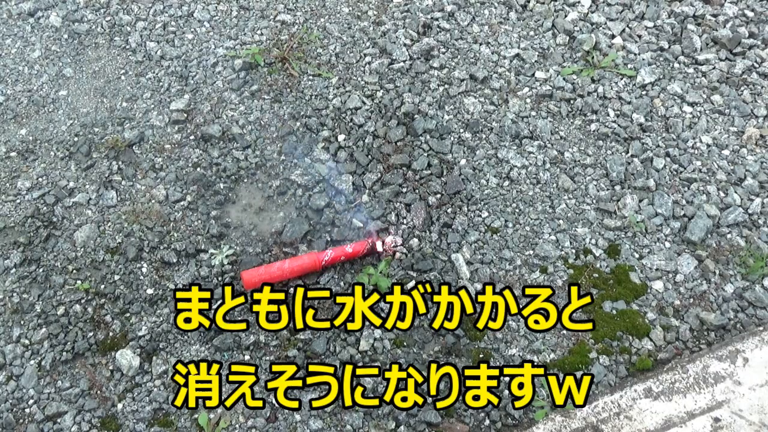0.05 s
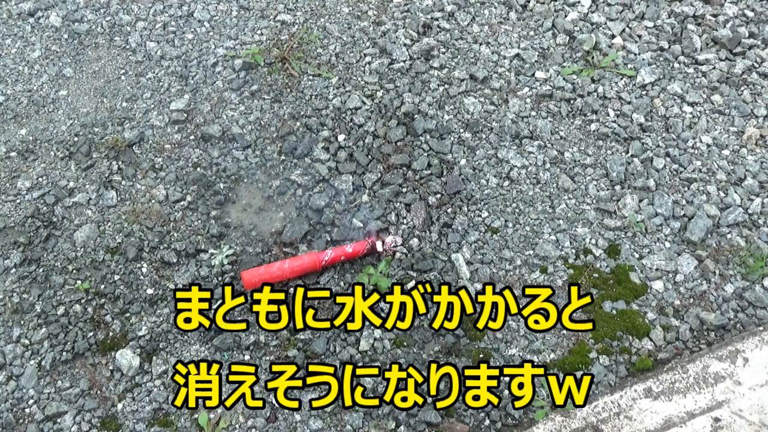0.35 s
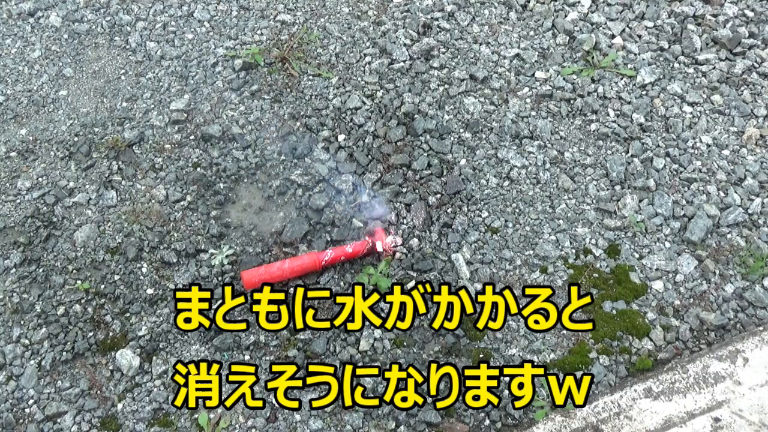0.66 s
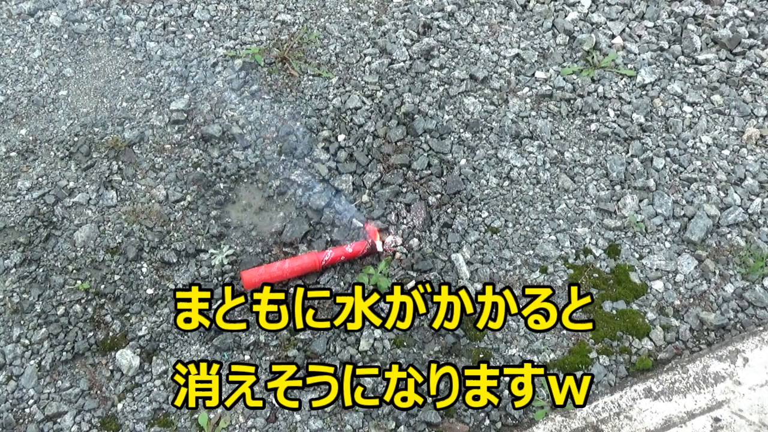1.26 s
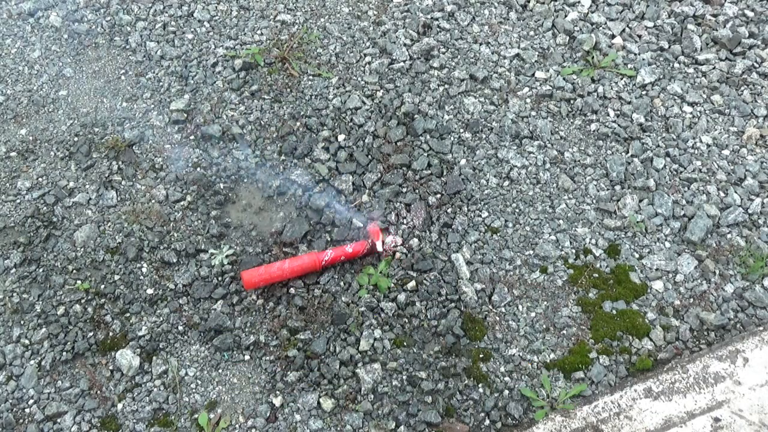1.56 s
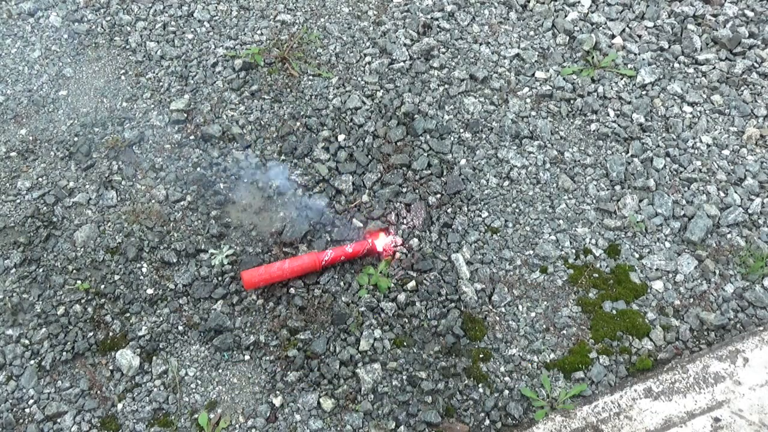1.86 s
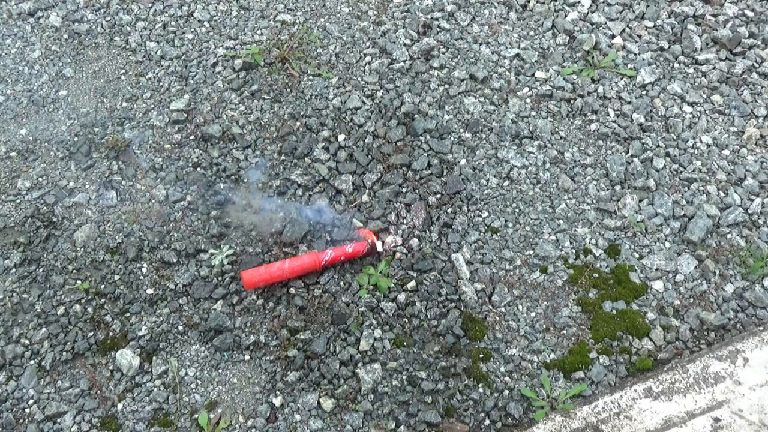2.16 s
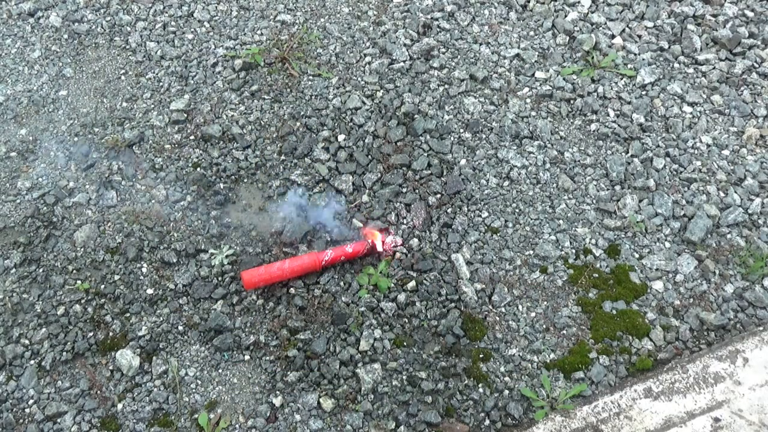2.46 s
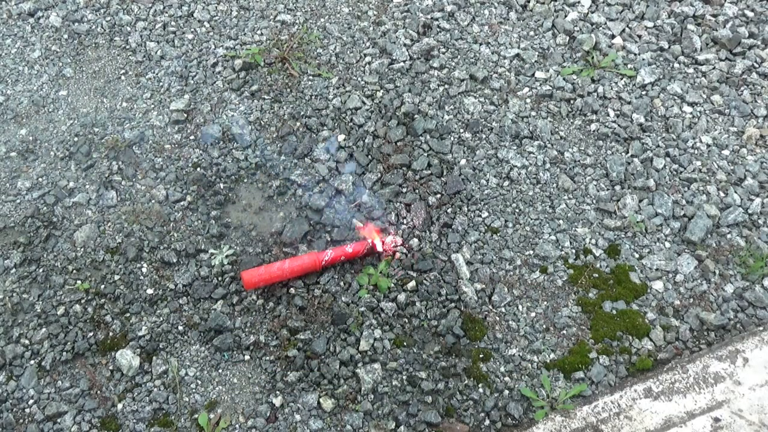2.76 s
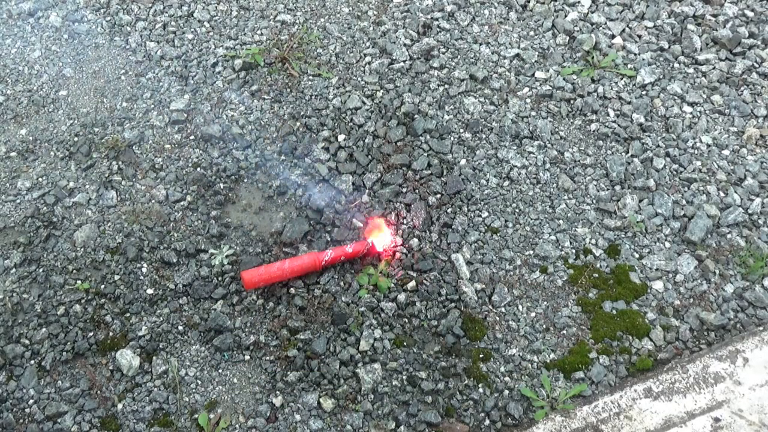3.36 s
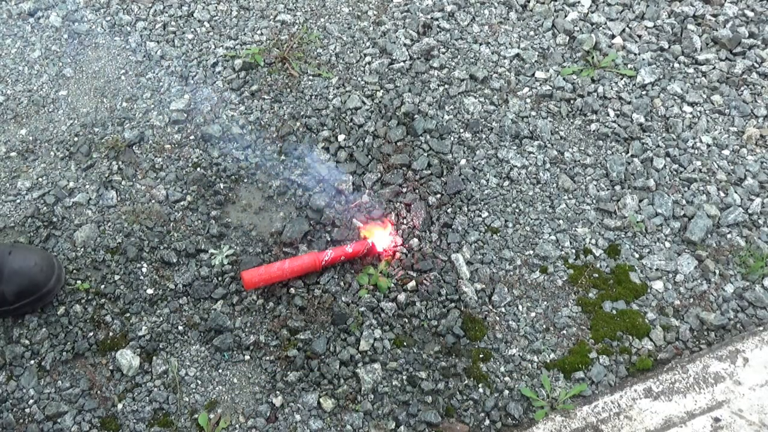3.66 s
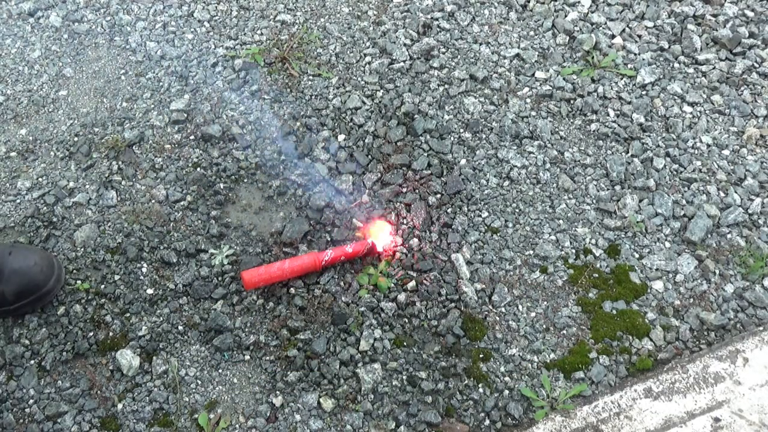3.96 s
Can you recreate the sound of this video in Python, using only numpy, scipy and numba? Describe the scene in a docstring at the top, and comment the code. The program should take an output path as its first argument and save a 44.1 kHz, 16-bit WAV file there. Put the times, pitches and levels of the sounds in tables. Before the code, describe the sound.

A burning flare hisses and sputters close by, with a footstep on gravel near the end.

```python
"""A bright, surging hiss: a road flare burns on wet gravel, a step from a hand-held camera's microphone.
Its sputtering gas jet crackles and whistles over a lower rush and a dull roar, and beads of slag spit.
The flame flutters low in the first half. Late on, someone steps up on the left: a shoe knocks on the
stones and scuffs the gravel. Faint outdoor noise lies behind it all."""
import sys
import numpy as np
from scipy import signal
from scipy.fft import rfft, irfft
from scipy.io import wavfile
from scipy.ndimage import uniform_filter1d, map_coordinates
from numba import njit

SR = 44100
rng = np.random.default_rng(int(sys.argv[2]) if len(sys.argv) > 2 else 0)


def store_pcm(level_fs):
    """Save levels as 16-bit WAV."""
    pcm = np.round(np.clip(level_fs, -1, 1) * 32767).astype(np.int16)
    wavfile.write(sys.argv[1], SR, np.atleast_2d(pcm).T)


N = 176400
TIME_S, BIN_HZ = np.arange(N) / SR, np.arange(N // 2 + 1) * SR / N
TOP_HZ = 15500


def undb(db):
    """Decibels to gain."""
    return 10 ** (np.asarray(db) / 20)

def unit(x):
    """Scale to rms 1."""
    return x / np.sqrt(np.mean(x ** 2))

def at_peak(x, db):
    """Scale to a peak level."""
    return undb(db) * x / np.abs(x).max()

def curve(rows):
    """Join (time_s, value) rows by straight lines."""
    return np.interp(TIME_S, *np.array(rows, float).T)

def colour(x, points):
    """Causal filter through (freq_hz, gain_db) points."""
    hz, db = np.array(points, float).T
    f = np.maximum(np.arange(N + 1) * SR / (2 * N), 1)
    gain = undb(np.interp(np.log(f), np.log(hz), db))
    cepstrum = irfft(np.log(gain))
    cepstrum[1:N] *= 2
    cepstrum[N + 1:] = 0
    return irfft(rfft(x, 2 * N) * np.exp(rfft(cepstrum)))[:N]

def walk(hz):
    """Smooth random motion with spread 1."""
    return unit(irfft(rfft(rng.standard_normal(N)) / (1 + (BIN_HZ / hz) ** 2), N))

def pan(x, left_db, below_hz=960):
    """Place a sound; only its low end differs much between the channels."""
    low = irfft(rfft(x) / (1 + (BIN_HZ / below_hz) ** 4), N)
    side = (undb(left_db) - 1) / (undb(left_db) + 1) * low
    return x + np.array([side, -side])

def clicks(per_s, spread_db):
    """Random impulses, most small and a few large."""
    chance, size, sign = rng.random((3, N))
    strength = np.minimum(-np.log(1 - size), 4.5)
    return unit((chance < per_s / SR) * undb(spread_db * strength) * np.sign(sign - .5))

@njit
def resonate(x, hz, width_hz):
    """Band-pass whose centre can move."""
    y, band_state, low_state = np.empty(len(x)), 0., 0.
    for i in range(len(x)):
        g, damping = np.tan(np.pi * hz[i] / SR), width_hz / hz[i]
        band = (band_state + g * (x[i] - low_state)) / (1 + g * (g + damping))
        band_state = 2 * band - band_state
        low_state += 2 * g * band
        y[i] = damping * band
    return y

def burst(start_s, decay_s):
    """Sudden noise that dies away."""
    age = TIME_S - start_s
    return rng.standard_normal(N) * (age >= 0) * np.exp(-np.abs(age) / decay_s)


# Open air all around the microphone: freq_hz, gain_db
OUTDOOR_COLOUR = [(20,-3),(60,-14.5),(130,0.5),(250,-3.5),(400,-23.5),(700,-7),(2000,-36),(10000,-46)]

def outdoors():
    """Faint, dull noise of the surroundings."""
    air = unit(colour(rng.standard_normal(N), OUTDOOR_COLOUR))
    return pan(air * undb(-47), left_db=-1)


# Gravel underfoot, growing louder on the left: time_s, level_db
SCUFF_LEVEL = [(0,-48),(2.5,-45),(2.95,-39.5),(3.25,-35.5),(3.55,-35.5),(3.7,-33),(3.8,-35.5),(4,-30.5)]
# Its muffled tone: freq_hz, gain_db
SCUFF_COLOUR = [(30,-33),(60,-14),(100,-3.5),(170,0.5),(280,2),(420,-2.5),(700,-7.5),(1100,-11),(2000,-45),(6000,-41)]

def scuff():
    """Shoes grind the gravel in a dense run of tiny contacts."""
    grind = unit(colour(clicks(per_s=1500, spread_db=1.5), SCUFF_COLOUR))
    return pan(grind * undb(curve(SCUFF_LEVEL)), left_db=6.5)


# Shoe contacts, left of the microphone: start_s, knock_db, cutoff_hz, decay_s, click_db
STEPS = [(3.129,-10,1300,0.0012,-10),(3.137,-15.5,1700,0.0019,-14),(3.1415,-15.5,1200,0.01,-22),(3.945,-21.5,254,0.043,-31)]
# Knock of the sole: freq_hz, gain_db
KNOCK_COLOUR = [(40,-41),(150,-1),(350,4),(600,-1),(1200,3),(3000,-13),(8000,-6)]
# Stone against stone: freq_hz, gain_db
STONE_COLOUR = [(2000,-31),(4200,-23),(5200,0),(6500,-9),(9000,-26),(14000,-47)]

def footsteps():
    """A shoe knocks on the stones and clicks them together."""
    out = np.zeros(N)
    for start_s, knock_db, cutoff_hz, decay_s, click_db in STEPS:
        knock = colour(burst(start_s, decay_s), KNOCK_COLOUR)
        knock = signal.sosfilt(signal.butter(4, cutoff_hz, fs=SR, output="sos"), knock)
        click = colour(burst(start_s, decay_s=.0005), STONE_COLOUR)
        out += at_peak(knock, knock_db) + at_peak(click, click_db)
    return pan(out, left_db=7)


# Flutter of the flame, a step ahead: time_s, relative_level_db
FLUTTER_LEVEL = [(.2,-49.5),(.4,-40),(.5,-37),(.57,-39.5),(.64,-38),(.77,-43.5),(.93,-33),(1.07,-33),(1.19,-46),(1.29,-37),(1.38,-52),(1.55,-36.5),(1.65,-53),(1.72,-39),(1.88,-43),(2.03,-40.5),(2.08,-30),(2.17,-41),(2.23,-34.5),(2.4,-50),(2.7,-52.5)]
# Its beat: time_s, pitch_hz
FLUTTER_PITCH = [(.92,101),(1.07,147),(1.2,99.4),(2.1,100),(2.23,121),(2.35,88)]
# The rumble around it: freq_hz, gain_db
RUMBLE_COLOUR = [(20,-15),(55,-5),(90,5),(150,1.5),(260,-9),(500,-24.5),(1500,-43)]

def flame():
    """The flame flutters at about a hundred beats a second, in swells, inside a low rumble."""
    beat = resonate(rng.standard_normal(N), curve(FLUTTER_PITCH), width_hz=17.7)
    beat = unit(signal.sosfilt(signal.butter(2, 250, fs=SR, output="sos"), beat))
    rumble = unit(colour(rng.standard_normal(N), RUMBLE_COLOUR))
    flutter = beat + undb(-5.5) * rumble
    swell = np.sqrt(np.abs(uniform_filter1d(flutter ** 2, size=1500)))
    steadied = unit(flutter / swell ** 0.27)  # partly evens out the random swells
    return pan(steadied * undb(curve(FLUTTER_LEVEL) + 4.5), left_db=0.9)


# Loud spits of slag, a step ahead: start_s, peak_db, ring_hz
SPITS = [(0.393,-5,6500),(0.419,-9,7500),(1.507,-12,7900),(1.752,-9,7550),(2.353,-6,7200),(2.396,-11,7500),(3.719,-5,8000)]

def spits():
    """Larger beads of slag burst with a short, bright ring, coloured like the hiss."""
    out = np.zeros(N)
    for start_s, peak_db, ring_hz in SPITS:
        pop = burst(start_s, decay_s=0.001) + 1e-18
        ring = resonate(pop, np.full(N, float(ring_hz)), width_hz=2600.)
        out += at_peak(colour(ring, HISS_COLOUR), peak_db)
    return out


def gas(surge):
    """Gas noise and tiny crackling pops surge together."""
    return surge * (rng.standard_normal(N) + undb(-7) * clicks(per_s=900, spread_db=2.5))


# Dull roar under the hiss: time_s, level_db
ROAR_LEVEL = [(0,-48),(.2,-45),(.42,-63),(.7,-43),(1.05,-41),(1.45,-43.5),(1.7,-36),(1.88,-38.5),(2.12,-40.5),(2.4,-41.5),(2.62,-38.5),(2.95,-38),(3.4,-36.5),(3.6,-37),(3.85,-32.5),(4,-31)]
# Its tone: freq_hz, gain_db
ROAR_COLOUR = [(100,-12.5),(250,3),(380,-4.5),(520,2),(700,1.5),(1100,5),(1500,1),(3000,-29.5)]

def roar(surge):
    """The low part of the gas jet, growing as it burns."""
    return unit(colour(gas(surge), ROAR_COLOUR)) * undb(curve(ROAR_LEVEL))


# Rush between roar and hiss: time_s, relative_level_db
RUSH_LEVEL = [(0,-32),(.15,-29),(.35,-32),(.58,-30.5),(.75,-27.5),(1.05,-29),(1.18,-26),(1.38,-29),(1.6,-28),(1.75,-28),(1.95,-27),(2.22,-27),(2.38,-29.5),(2.6,-25),(2.72,-28.5),(3.07,-25.5),(3.3,-27),(3.41,-25.5),(3.6,-27.5),(3.85,-24.5),(4,-24)]
# Its tone: freq_hz, gain_db
RUSH_COLOUR = [(150,-24),(400,-12.5),(700,-9),(1100,-5.5),(1500,-0.5),(2200,1.5),(2600,-2.5),(2850,-6),(3300,-5.5),(3800,1),(4200,-4.5),(4520,1),(4800,-15.5),(5600,-23),(9000,-16)]

def rush(surge):
    """The midrange of the gas jet."""
    return unit(colour(gas(surge), RUSH_COLOUR)) * undb(curve(RUSH_LEVEL) + 0.5)


# Puffs of gas at the flare's mouth: peak_s, half_length_s, level_db, pitch_hz, hiss_shift_fraction
PUFFS = [(0.33,0.037,-29,5930,-.02),(.77,0.021,-24,7820,-0.053),(0.837,0.032,-23,8960,-0.015),(1.07,0.02,-39,8700,-0.041),(1.18,.03,-21,8300,0.02),(1.24,0.084,-26.5,9870,-0.016),(1.69,0.02,-26,7350,-0.041),(1.84,.035,-19.5,8000,0.02),(2.077,0.03,-19,8620,-0.0097),(2.21,0.021,-41,7340,0.064),(2.472,0.047,-20,8000,0.1),(2.718,.05,-22,9000,0.028),(3.133,0.1,-25.5,9300,0.0017),(3.872,.06,-22,9800,0.0013)]

def puffs(surge, width_hz=480., glide_hz_per_s=5500):
    """Each puff whistles briefly upwards; also returns how far the puffs shift the hiss resonances."""
    whistle, shift = np.zeros(N), np.zeros(N)
    for peak_s, half_s, level_db, pitch_hz, hiss_shift in PUFFS:
        age = TIME_S - peak_s
        swell = np.exp(-(age / half_s) ** 2)
        centre_hz = pitch_hz + glide_hz_per_s * np.clip(age, -2 * half_s, 2 * half_s)
        ring = resonate(surge * rng.standard_normal(N), centre_hz, width_hz)
        whistle += undb(level_db) * swell * unit(resonate(ring, centre_hz, 2 * width_hz))
        shift += hiss_shift * np.sqrt(swell)
    return whistle, shift


def patchy(x, bands=12, spread_db=1.6):
    """Neighbouring bands swell and fade on their own."""
    place = BIN_HZ / TOP_HZ * bands
    spectrum, out = rfft(x), np.zeros(N)
    for k in range(bands + 1):
        band = irfft(spectrum * np.maximum(1 - np.abs(place - k), 0), N)
        out += band * undb(spread_db * walk(hz=5.3))
    return out

def stone_reflection(x):
    """A close reflection off the stones, swayed by the moving flame, gives the treble a phasing swish."""
    delay_s = 0.000545 * (1 + 0.098 * walk(hz=4.8))
    treble = signal.sosfiltfilt(signal.butter(4, 7500, "high", fs=SR, output="sos"), x)
    echo = map_coordinates(treble, [np.arange(N) - delay_s * SR], order=3, mode="mirror")
    return x + undb(-13.5) * echo


# Resonances of the flare's mouth: freq_hz, gain_db
HISS_COLOUR = [(3500,-45),(4450,-14.5),(4950,-21.5),(5350,-15.5),(5650,-6.5),(6050,-9.5),(6300,-1.5),(7100,1.5),(7850,-2),(8230,-9),(8550,-1.5),(9600,-1.5),(10800,-6),(11500,-12),(12100,-23),(13200,-17),(15500,-27)]
# Brightness of the hiss: time_s, tilt_db_per_octave
HISS_TILT = [(0,-2),(.27,0.5),(.34,-8),(.48,-5),(.63,0),(.85,3.5),(1.4,-3),(1.8,3.5),(2.22,1),(2.35,-2.5),(2.5,-3.5),(3,0),(3.25,3.5),(3.55,-2.5),(3.87,6),(4,0)]

def nozzle(x, stretch):
    """The burning mouth colours the gas; its resonances slide and its treble opens and closes."""
    framing = dict(fs=SR, nperseg=512, noverlap=384)
    f, t, frames = signal.stft(x, **framing)
    at = np.minimum((t * SR).astype(int), N - 1)
    hz, db = np.array(HISS_COLOUR).T
    octave = np.log2(np.maximum(f, 1)[:, None] / stretch[at])
    tilt_db = curve(HISS_TILT)[at] * np.maximum(octave - np.log2(hz[0]), 0)
    gain = undb(np.interp(octave, np.log2(hz), db) + tilt_db)
    gain /= np.sqrt(np.mean(gain ** 2, axis=0))  # power holds as the colour moves
    return unit(signal.istft(frames * gain, **framing)[1][:N])


# Strength of the burn, a step in front of the microphone: time_s, level_db
HISS_LEVEL = [(0,-21),(.14,-18.5),(.34,-23.5),(.49,-21),(.61,-22.5),(.75,-17.5),(1,-20),(1.08,-16.5),(1.35,-21),(1.5,-17),(1.63,-20),(1.68,-17),(1.76,-20.5),(1.84,-17.5),(2.07,-17.5),(2.25,-18.5),(2.4,-22),(2.48,-16.5),(2.57,-19),(2.8,-17),(2.9,-19.3),(3.1,-16.5),(3.48,-18),(3.54,-15),(3.63,-18.5),(3.74,-15),(4,-16.5)]
# The part of the hiss that differs between left and right: freq_hz, gain_db
SIDE_COLOUR = [(4500,-49),(5600,-16),(6500,10),(7600,7),(9500,-1.5),(10300,-4),(10900,-65)]

def hiss(surge, shift):
    """The gas jet hisses through wandering resonances, with a little stereo width."""
    jet = stone_reflection(patchy(gas(surge)))
    middle = nozzle(jet, stretch=1 + shift + 0.0098 * walk(hz=18))
    side = undb(-23) * unit(colour(surge * rng.standard_normal(N), SIDE_COLOUR))
    return (middle + np.array([side, -side])) * undb(curve(HISS_LEVEL))

def flare():
    """One uneven flow of gas drives the hiss, whistles, rush and roar."""
    surge = undb(0.85 * walk(hz=44.6) + 0.84 * walk(hz=250))  # surges plus faster sputter
    whistle, shift = puffs(surge)
    return hiss(surge, shift) + whistle + rush(surge) + roar(surge)


def scene():
    """Flare in the middle, feet on the left, open air around."""
    return flare() + spits() + flame() + footsteps() + scuff() + outdoors()

def record(dry):
    """The hand-held camera cuts the top treble."""
    return signal.sosfilt(signal.ellip(10, .2, 80, TOP_HZ, fs=SR, output="sos"), dry)


dry = scene()
out = record(dry)
store_pcm(out)
```